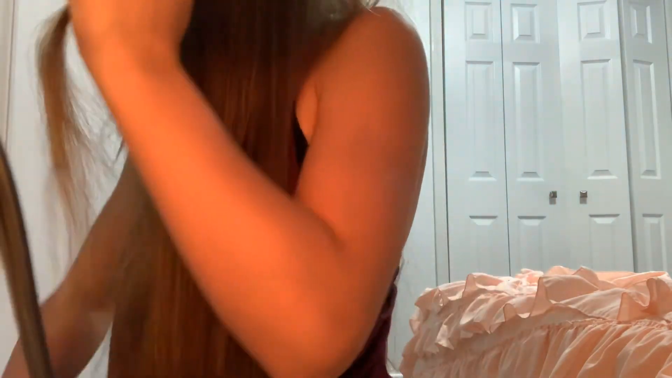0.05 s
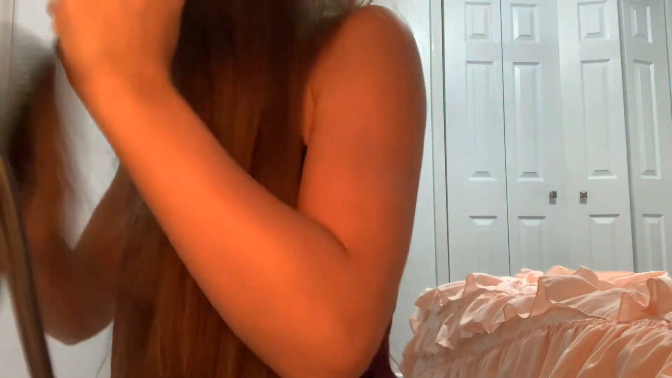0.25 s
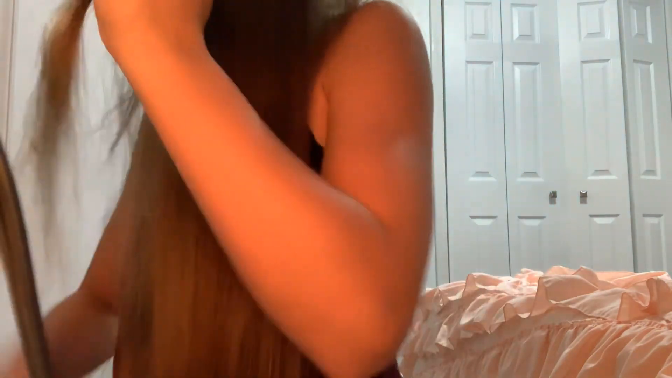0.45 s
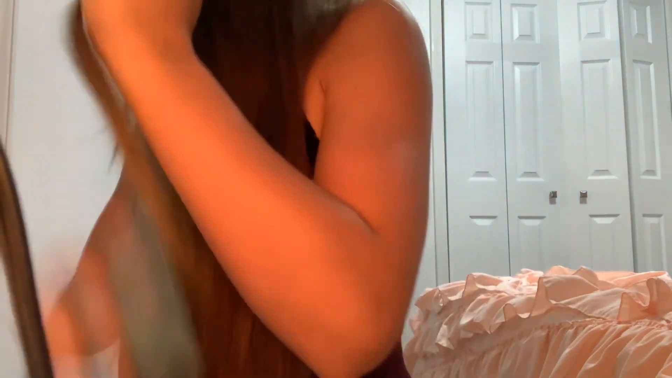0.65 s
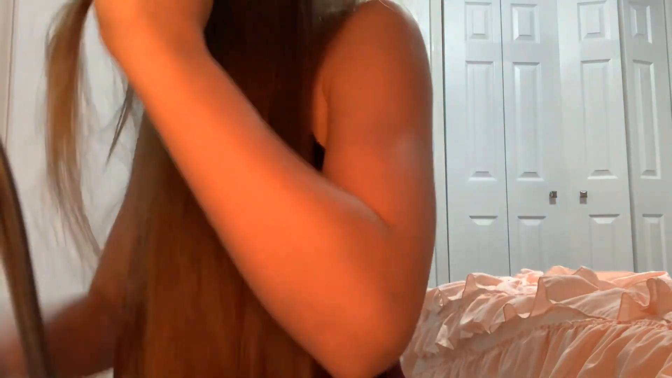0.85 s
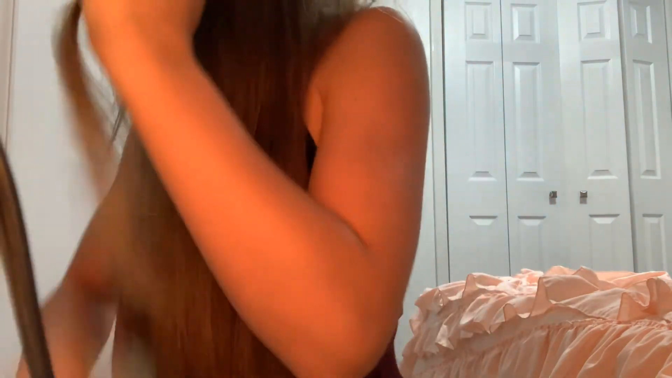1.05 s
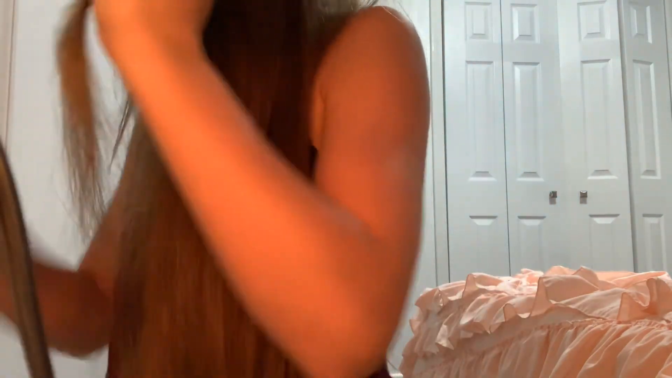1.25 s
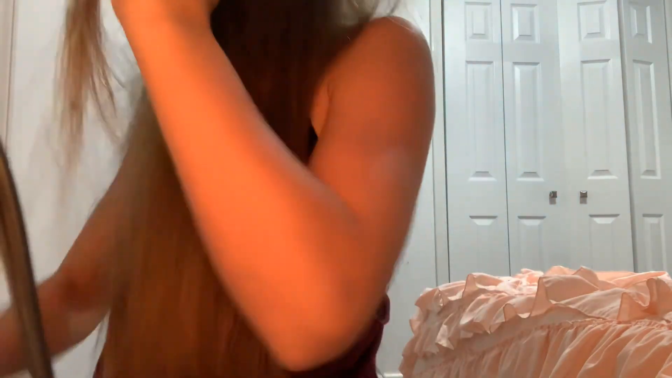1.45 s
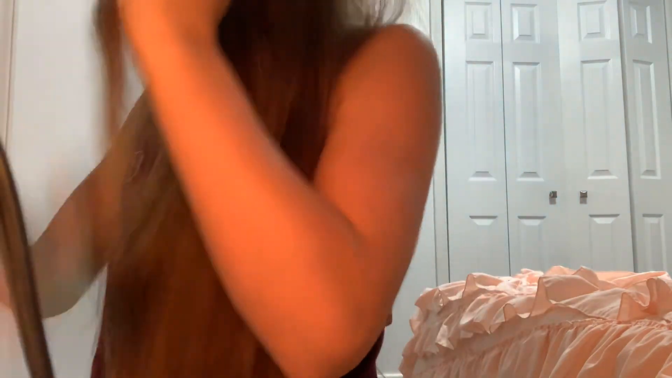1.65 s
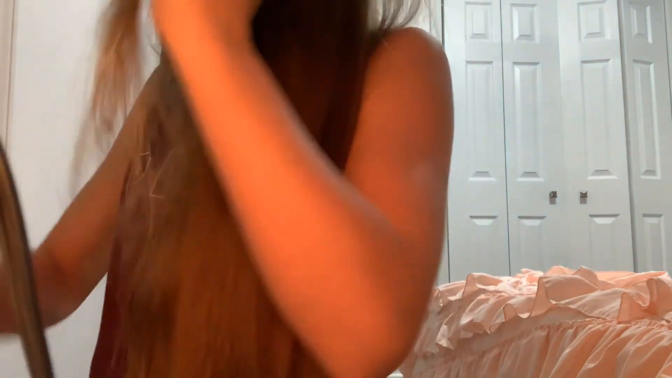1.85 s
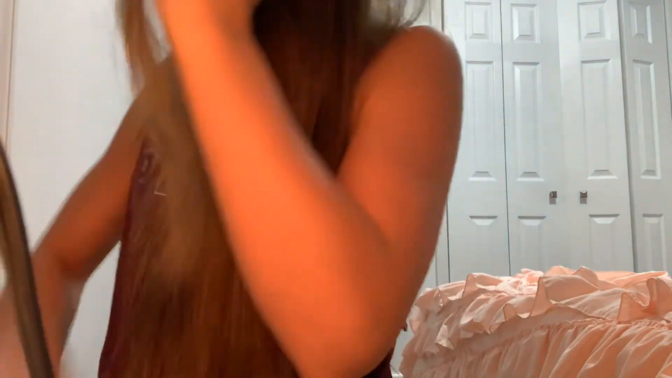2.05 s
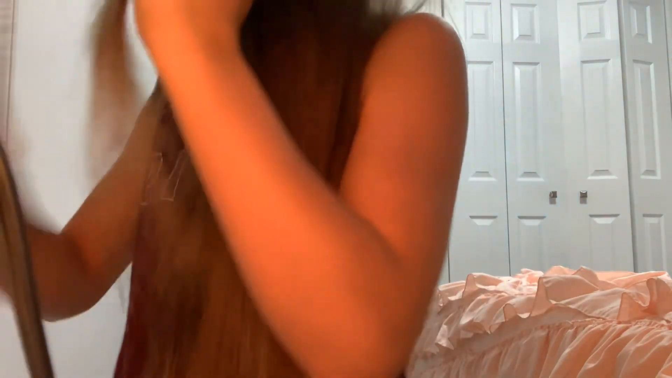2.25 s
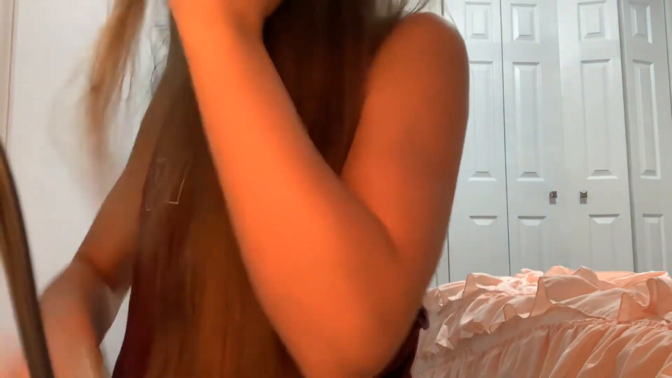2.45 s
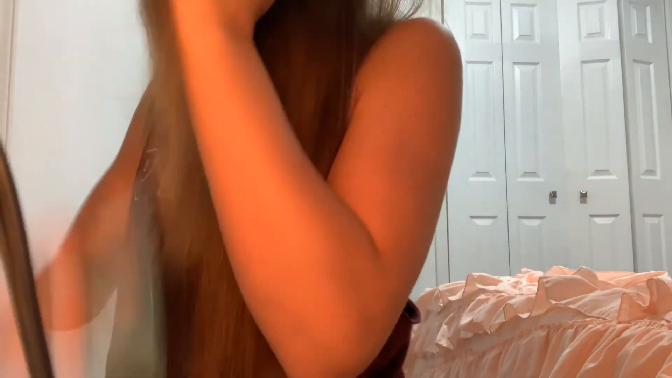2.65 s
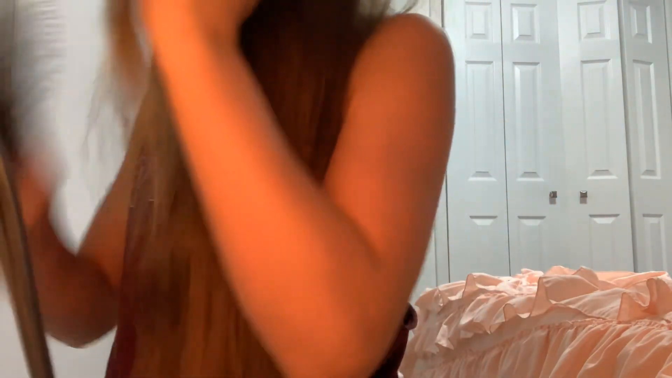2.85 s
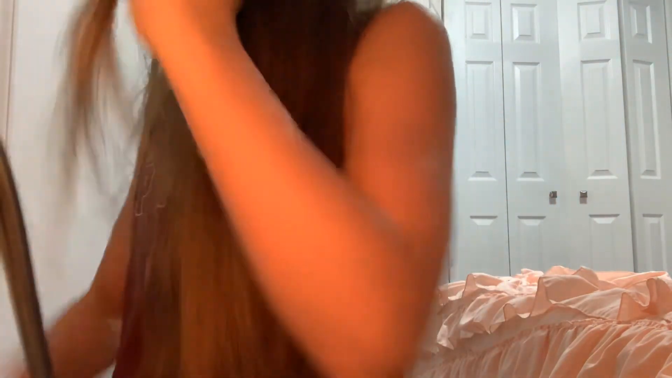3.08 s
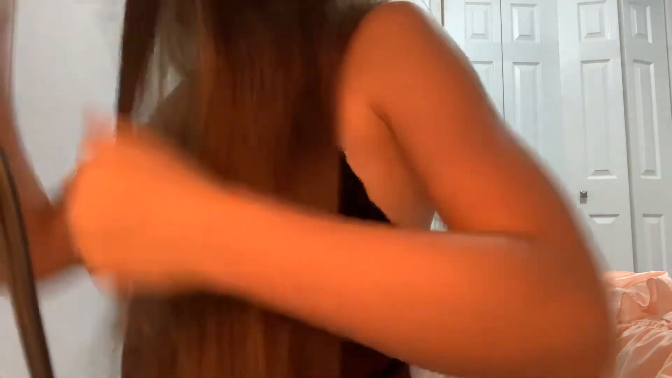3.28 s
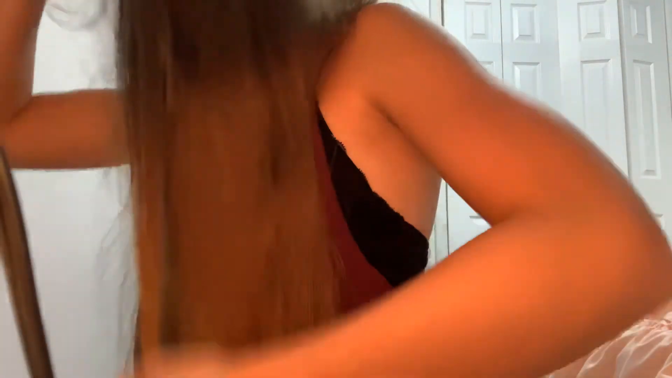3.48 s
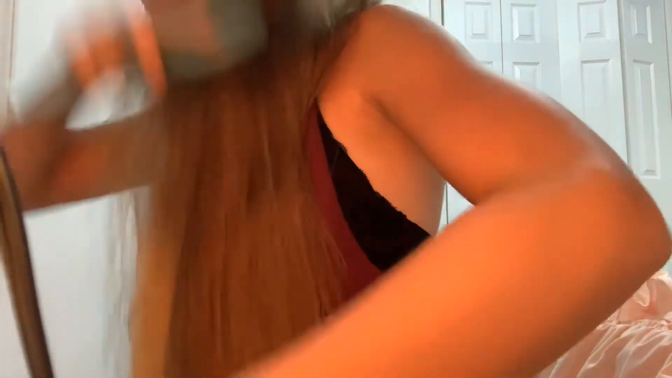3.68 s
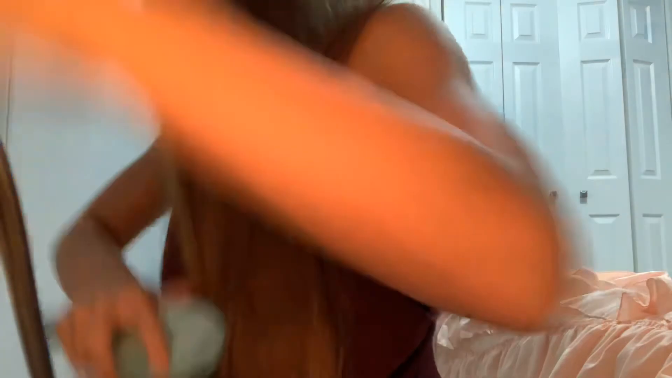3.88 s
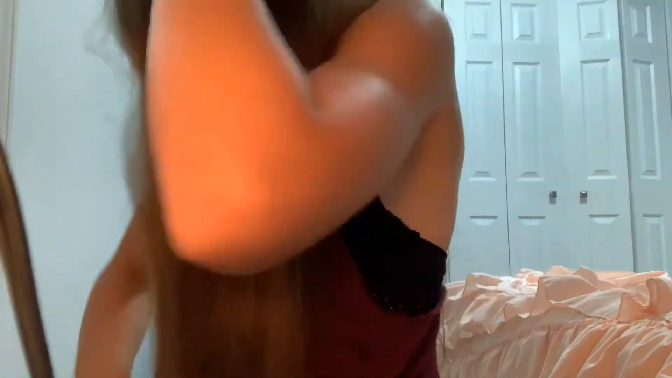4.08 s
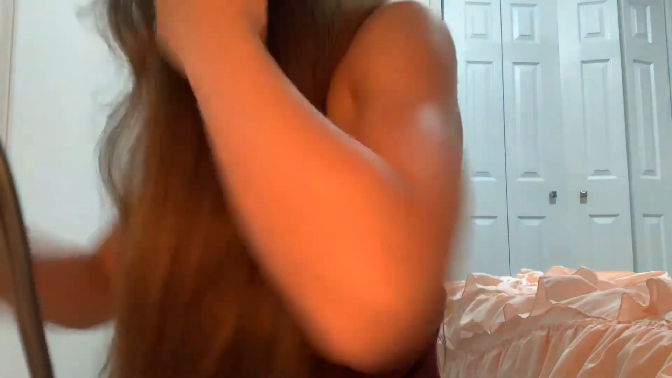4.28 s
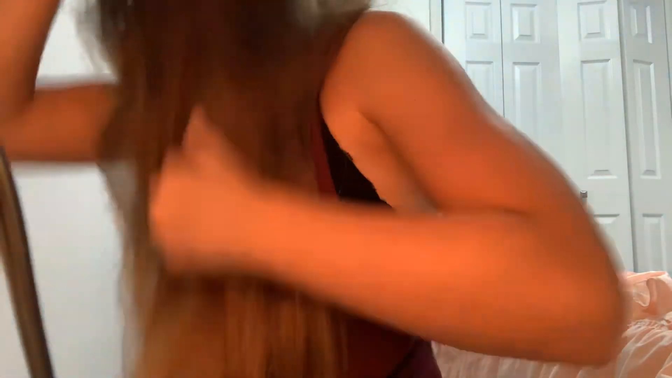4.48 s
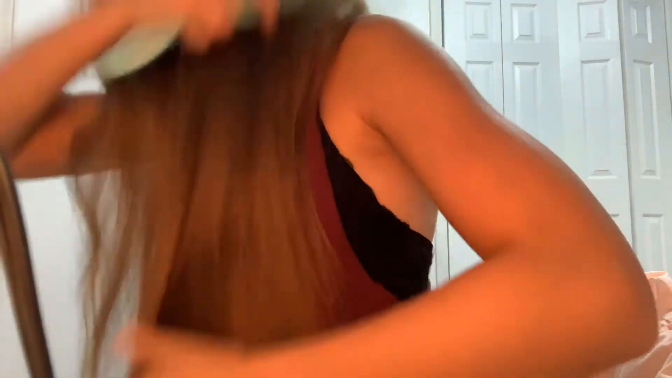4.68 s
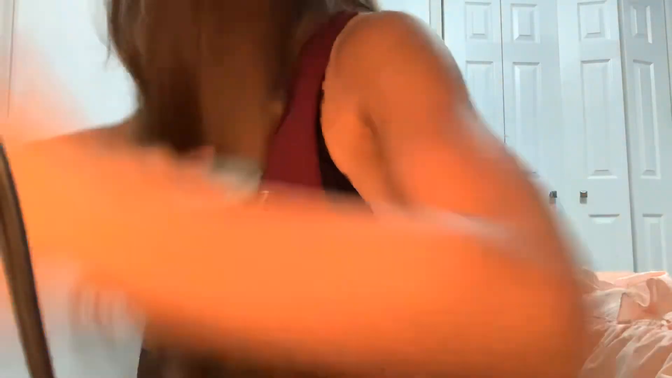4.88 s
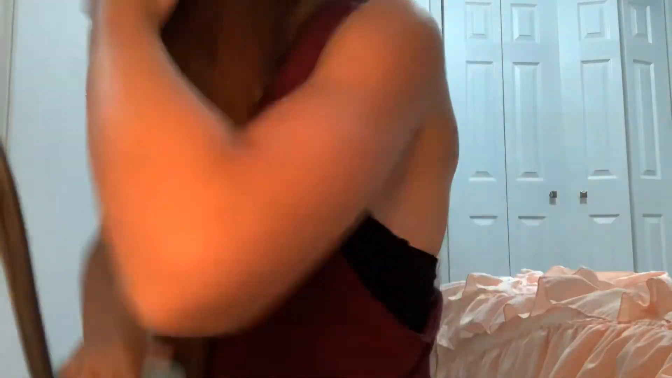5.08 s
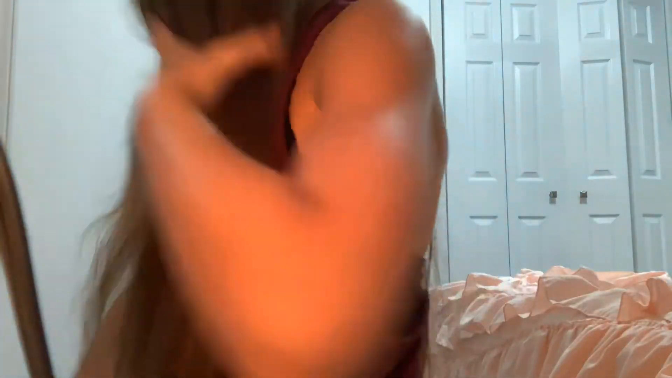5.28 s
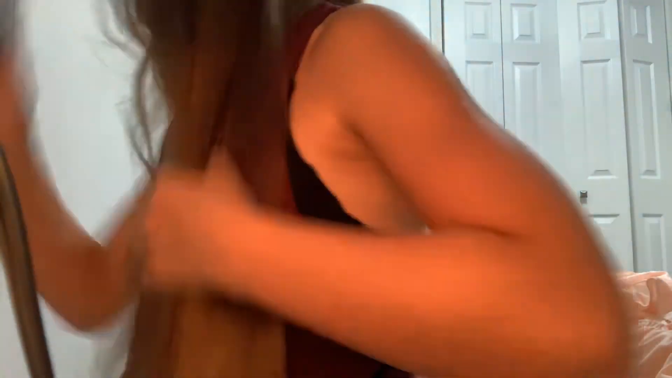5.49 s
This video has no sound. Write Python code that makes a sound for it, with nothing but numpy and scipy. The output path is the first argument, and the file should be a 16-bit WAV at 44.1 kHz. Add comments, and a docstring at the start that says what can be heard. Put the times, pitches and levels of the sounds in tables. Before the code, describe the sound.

A hairbrush snaps through knotted long hair in separate hollow crackling tugs, then makes two longer hissing, snagging strokes in a quiet bedroom.

```python
"""A cushion hairbrush works through long knotted hair close to a small microphone in a quiet bedroom.
Short tugs tear through the ends: bristles flick free in a crackle of impulses, and the pad thuds back
as a set of struck resonances. Two long strokes follow, filtered streams of tiny flicks that hiss at the
top and snag lower down, with short rubs around them. The room adds a decaying diffuse tail,
and filtered noise below it all makes soft moving air and a low ventilation hum."""
import sys
import numpy as np
from scipy import signal
from scipy.fft import rfft, irfft, next_fast_len
from scipy.io import wavfile
from scipy.ndimage import uniform_filter1d

SR = 44100
rng = np.random.default_rng(int(sys.argv[2]) if len(sys.argv) > 2 else 0)


def log_audio(samples):
    """Write samples as a 16-bit WAV file to the path given in sys.argv[1]."""
    # one column per channel
    frames = np.atleast_2d(samples).T
    # limit to full scale, then quantise
    limited = np.clip(frames, -1, 1)
    pcm = np.round(limited * 32767).astype(np.int16)
    wavfile.write(sys.argv[1], SR, pcm)


N = 243843
T = np.arange(N) / SR

# Short tugs, each tearing out of a knot in two steps; levels and spread are those of the second step:
# (start_s, spread_s, crackle_db, scrape_db, thud_db, pitch_hz, thud_lag_s, first_step_lead_s,
#  first_step_pitch_hz)
TUGS = [(.304, 0.0032, -40, -43.5, -33.5, 648, .0023, .003, 843),
        (.636, .0042, -42, -42.5, -34.5, 593, 0.00086, 0.0072, 800),
        (.739, 0.00099, -59, -48.5, -49, 990, .004, 0.00078, 810),
        (1.01, 0.004, -38.5, -41.5, -32, 910, 0.00047, .002, 548),
        (1.334, 0.0023, -48.5, -49.5, -35, 687, 0.00052, 0.0024, 647),
        (1.649, 0.0021, -50, -57, -40, 729, 0.00017, 0.0011, 865),
        (1.9998, 0.0027, -48, -55.5, -39, 797, 0.00025, 0.0048, 970),
        (2.3483, 0.0026, -37.5, -39, -28, 1158, 0.00149, 0.0017, 556),
        (2.640, 0.0024, -43, -43.5, -32.5, 766, 0.0012, .0065, 517),
        (2.940, 0.00271, -34.5, -55, -29, 714, 0.0045, .004, 736)]
# Small tangles that the brush jerks through during a stroke: (start_s, spread_s, thud_db, pitch_hz)
TANGLES = [(3.543, 0.0018, -53, 1060), (3.588, .007, -49, 1010), (3.617, .007, -49.5, 964),
           (3.803, .007, -44.5, 880), (3.877, 0.0014, -39, 870), (3.899, 0.0029, -39.5, 864),
           (3.959, 0.0057, -42, 960), (4.062, 0.0029, -44.5, 596), (4.088, 0.00714, -37, 597),
           (4.541, 0.0026, -54.5, 870), (4.68, 0.0061, -47.5, 905), (4.871, 0.0094, -40, 730),
           (4.95, 0.0043, -45.5, 680), (5.172, .008, -46.5, 790), (5.207, .006, -46, 690)]
FIRST_STEP_DB, FIRST_SPREAD = -5.5, 0.66  # the first step is weaker and shorter than the second
FIRST_TOP_DB, SECOND_TOP_DB = 8.5, -5.5  # treble of the crackle in each step
TANGLE_CRACKLE_DB, TANGLE_SCRAPE_DB = -20.5, -9  # relative to the thud
TANGLE_LAG_S, TANGLE_TOP_DB = 0.00045, -6


def knots():
    """Stick-slip release: a knot gives way in two quick steps, a tangle in a single softer, duller snap."""
    steps = []
    for start_s, spread, *levels_db, hz, lag, lead, first_hz in TUGS:
        first_db = np.add(levels_db, FIRST_STEP_DB)
        steps.append((start_s - lead, FIRST_SPREAD * spread, *first_db, first_hz, lag, FIRST_TOP_DB))
        steps.append((start_s, spread, *levels_db, hz, lag, SECOND_TOP_DB))
    for start_s, spread, thud_db, hz in TANGLES:
        levels_db = (thud_db + TANGLE_CRACKLE_DB, thud_db + TANGLE_SCRAPE_DB, thud_db)
        steps.append((start_s, spread, *levels_db, hz, TANGLE_LAG_S, TANGLE_TOP_DB))
    out = np.zeros(N)
    for start_s, *knot in steps:
        sound = snap(*knot)
        first = int(start_s * SR) - len(sound) // 2
        out[first:first + len(sound)] += sound
    return out


# Spectrum of the bristle ticks: (frequency_hz, level_db)
CRACKLE_SPECTRUM = [(200, -20), (1000, 19), (1300, -23), (1700, -10), (2300, 12.5), (2900, -3.5),
                    (3450, -2.5), (4300, 4), (5000, 4.5), (7600, 8), (9500, -2.5), (12500, 4.5),
                    (15500, 1.5)]
# Narrow resonances that colour the crackle, as from the microphone or a near reflection:
# (frequency_hz, width_hz, level_db over the plain crackle)
CRACKLE_RESONANCES = [(2890, 94, 9), (6040, 51, -2), (6720, 110, -3), (13000, 140, -4), (14700, 91, 11),
                      (14700, 130, -12)]
# Spectrum of hair scraping on bristles, in the snaps and the strokes: (frequency_hz, level_db)
SCRAPE_SPECTRUM = [(200, 3), (500, 8), (1250, -2.5), (1500, 4.5), (1750, 5), (2150, 7), (2500, 9.5),
                   (2800, 0.5), (3100, 1.5), (3500, -5), (6000, -5.5), (7900, -12), (9000, -34),
                   (16000, -39)]
# Radiation of the thud from the brush: (frequency_hz, level_db)
RADIATION_SPECTRUM = [(200, 2.5), (300, -1.5), (410, -19.5), (520, 0.5), (1200, -3.5), (1500, -10.5)]


def snap(spread, crackle_db, scrape_db, thud_db, hz, lag, top_db,
         spring_width_hz=130, spring_db=-5, rattle_db=-2, size=4096):
    """Release of elastic energy: bristles tick free in a rush, and the bent pad springs back just after."""
    t = (np.arange(size) - size // 2) / SR
    # the bristles go almost together, so the burst has steep edges
    rush = np.exp(-np.abs(t / (2.65 * spread)) ** 3)

    ticks = flicks(rate=5500, scatter_db=10.5, size=size) * rush
    crackle = colour(colour(ticks, CRACKLE_SPECTRUM), [(7000, 0), (11000, top_db)])
    crackle = crackle + sum(undb(db) * ring(crackle, f, width) for f, width, db in CRACKLE_RESONANCES)

    scrape = colour(flicks(rate=4400, scatter_db=0.5, size=size) * rush, SCRAPE_SPECTRUM)

    kicks = flicks(rate=3000, scatter_db=2.0, size=size) * bell(t, lag, spread)
    rattle = pad(kicks, hz, reach_octaves=1.1)
    # the release itself is one push, which swells and dies within a few cycles
    push = signal.unit_impulse(size, np.searchsorted(t, lag - spread / 2))
    spring = ring(ring(push, hz, spring_width_hz), hz, spring_width_hz)
    thud = colour(undb(rattle_db) * unit(rattle) + undb(spring_db) * unit(spring), RADIATION_SPECTRUM)

    mix = undb(crackle_db) * unit(crackle) + undb(scrape_db) * unit(scrape) + undb(thud_db) * unit(thud)
    # levels are those of the energy gathered into a hundredth of a second
    return np.sqrt(SR / 100 / size) * mix


# Modes of the brush pad and back: (frequency_hz, width_hz, level_db before weighting by the focus)
PAD_MODES = [(565, 200, 5.5), (685, 105, 1.5), (824, 111, 4), (975, 51, 3), (1139, 34, 7), (1426, 99, -6)]


def pad(x, focus_hz, reach_octaves, low_hz=440, high_hz=1400):
    """Modal resonance: modes near the focus ring most; the body is too small for bass, too soft for treble."""
    body = 0
    for hz, width, db in PAD_MODES:
        distance = np.log2(hz / focus_hz) / reach_octaves
        body = body + undb(db) * ring(x, hz, width) / (1 + distance ** 2)
    band = signal.butter(2, [low_hz, high_hz], "band", fs=SR, output="sos")
    return signal.sosfilt(band, body)


# Spectrum of strands sliding past bristles: (frequency_hz, level_db)
HISS_SPECTRUM = [(200, -5.5), (700, 9), (1700, -2), (2600, 3), (3400, 1), (4400, 2.5), (6200, 3.5),
                 (7900, 3.5), (8600, -7), (10000, -16), (12500, -5), (14800, -10)]
# Spectrum of the top hiss: (frequency_hz, level_db)
SHEEN_SPECTRUM = [(4000, -32), (7500, 6.5), (9000, 8.5), (11000, 5.5), (13000, -12), (14800, 7),
                  (16000, 14)]


def brushing(hiss_db=1, drag_db=-1, scrape_db=1, sheen_db=3.0, catch_db=2):
    """Sliding friction: strands hiss past the bristles, which flick back, scraping and ringing the pad."""
    slide, drag, scrape, sheen, pad_hz = gestures()
    catch = undb(catch_db * walk(rate=180))  # tangles hold and let go unevenly
    strands = flicks(rate=24000, scatter_db=5.5)
    tips = flicks(rate=22000, scatter_db=5)
    bristles = flicks(rate=2600, scatter_db=7.5) * catch
    tangles = flicks(rate=2600, scatter_db=7.5) * catch
    return (undb(hiss_db) * slide * unit(colour(strands, HISS_SPECTRUM))
            + undb(sheen_db) * sheen * unit(colour(tips, SHEEN_SPECTRUM))
            + undb(scrape_db) * scrape * unit(colour(tangles, SCRAPE_SPECTRUM))
            + undb(drag_db) * drag * unit(pad(bristles, pad_hz, reach_octaves=0.3)))


# All levels in these three tables are before the mix gains of brushing().
# Speed of the brush down each long stroke, as the level of its hiss: one list a stroke of (time_s, level_db)
SPEED_CURVES = [
    [(3.47, -72.5), (3.53, -79), (3.564, -68.5), (3.68, -56.5), (3.856, -61.5), (3.88, -54), (3.922, -62),
     (4.056, -65), (4.09, -83), (4.108, -69)],
    [(4.52, -75), (4.526, -68.5), (4.562, -78.5), (4.71, -54), (4.748, -60), (4.878, -52), (4.892, -58),
     (5.114, -69), (5.186, -67.5), (5.215, -90)],
]
# Drag of the hair on the bristles, as the level of the pad: one list a stroke of (time_s, level_db)
DRAG_CURVES = [
    [(3.47, -61), (3.622, -52.5), (3.65, -60), (3.868, -50.5), (3.9, -39.5), (3.926, -50.5), (4.108, -45.5)],
    [(4.52, -56.5), (4.544, -51), (4.554, -54.5), (4.852, -46), (4.862, -44), (5.064, -59), (5.215, -44)],
]
# Short rubs of brush and hand on the hair: (centre_s, spread_s, hiss_db, pad_db, scrape_db)
SHORT_RUBS = [(.005, 0.014, -63, -54.5, -61), (.067, 0.01, -72.5, -60.5, -75),
              (.272, 0.0042, -62.5, -49, -62), (0.286, 0.0036, -56, -42, -49),
              (0.712, 0.0019, -75, -44, -60), (.724, 0.0038, -70, -49, -57),
              (0.749, 0.0051, -65, -44, -58.5), (1.115, 0.027, -89, -80, -72),
              (1.676, 0.017, -81, -76, -67), (2.096, 0.032, -98, -57.5, -72),
              (2.391, 0.031, -70, -55.5, -67.5), (3.2, 0.0078, -67, -67.5, -82),
              (3.24, 0.031, -76, -77, -78.5), (5.505, 0.014, -79, -74, -80)]
ENTER_S, LEAVE_S = 0.014, 0.021  # the bristles sink into the hair, and slip off its ends
PAD_TOP_HZ, PAD_ENDS_HZ, PAD_RUB_HZ = 917, 820, 856  # the pad rings lower as hair gathers in it
SCRAPE_TOP_DB, SCRAPE_ENDS_DB = -6.5, -3  # relative to the mean of hiss and pad; the ends are more tangled
SHEEN_TOP_DB, SHEEN_ENDS_DB = 4.5, -1  # smooth hair near the scalp has more top hiss than the ends
# top hiss grows faster than hiss, and equals it at this level before the two settings above
SHEEN_EVEN_DB, SHEEN_POWER = -48.5, 1.61


def gestures():
    """Friction control: speed and drag set the gains of hiss, pad, scrape and top hiss, and pad pitch falls."""
    gains = np.zeros((3, N))  # hiss, pad, scrape
    gloss_db = np.zeros(N)
    pad_hz = np.full(N, float(PAD_RUB_HZ))
    for speed, drag in zip(SPEED_CURVES, DRAG_CURVES):
        start, end = speed[0][0], speed[-1][0]
        contact = np.interp(T, [start - ENTER_S, start, end, end + LEAVE_S], [0, 1, 1, 0])

        def down(top, ends):
            """Linear interpolation from the scalp to the ends."""
            return np.interp(T, [start, end], [top, ends])

        hiss_db = np.interp(T, *np.transpose(speed))
        pad_db = np.interp(T, *np.transpose(drag))
        # scraping takes both speed and drag
        scrape_db = (hiss_db + pad_db) / 2 + down(SCRAPE_TOP_DB, SCRAPE_ENDS_DB)
        gains += contact * undb([hiss_db, pad_db, scrape_db])
        gloss_db += contact * down(SHEEN_TOP_DB, SHEEN_ENDS_DB)
        pad_hz = np.where(contact > 0, down(PAD_TOP_HZ, PAD_ENDS_HZ), pad_hz)
    for centre_s, spread, *levels_db in SHORT_RUBS:
        gains += undb(levels_db)[:, None] * bell(T, centre_s, spread)
    sheen = undb(SHEEN_EVEN_DB + gloss_db) * (gains[0] / undb(SHEEN_EVEN_DB)) ** SHEEN_POWER
    return (*gains, sheen, pad_hz)


def flicks(rate, scatter_db, size=N):
    """Random impulse train: single bristles let go at random moments, some much harder than others."""
    happens = rng.random(size) < rate / SR  # rate is the mean number a second
    sign = np.sign(rng.random(size) - .5)
    strength = np.clip(rng.standard_normal(size), -2, 2)
    return happens * sign * undb(scatter_db * strength)


def walk(rate):
    """Slow random modulation: levels held 1 / rate s and smoothed, scaled to rms 1."""
    hold = int(SR / rate)
    steps = np.repeat(rng.standard_normal(N // hold + 1), hold)
    return unit(uniform_filter1d(steps, hold)[:N])


# Bedroom reverberation, the time to decay by 60 dB: (frequency_hz, t60_s)
DECAY_TIMES = [(300, 0.25), (900, 0.26), (2500, 0.23), (7000, 0.18), (15000, 0.12)]
# Spectrum that colours the tail: (frequency_hz, level_db)
TAIL_SPECTRUM = [(300, 3.5), (680, -3.5), (1100, -5.5), (2400, 0), (5000, -1.5), (15000, 0.5)]


def room(x, wet_db=-13, first_s=0.0058, size=22050):
    """Diffuse reverberation: walls and doors return a short tail whose highest treble dies first."""
    t = np.arange(size) / SR
    hz = np.fft.rfftfreq(size, 1 / SR)
    noise = rfft(rng.standard_normal(size))
    centres = [f for f, t60 in DECAY_TIMES]
    tail = 0
    # overlapping bands, each with its own exponential decay
    for (f, t60), pick in zip(DECAY_TIMES, np.eye(len(centres))):
        weight = read(list(zip(centres, pick)), hz)
        tail = tail + irfft(noise * weight, size) * np.exp(-np.log(1000) * t / t60)
    onset = np.clip(t / first_s - 1, 0, 1)  # silent until first_s, full at twice that
    tail = colour(tail * onset, TAIL_SPECTRUM)
    return x + undb(wet_db) * signal.fftconvolve(x, unit(tail) / np.sqrt(size))[:N]


# Spectrum of the moving air: (frequency_hz, level_db)
AIR_SPECTRUM = [(25, -15.5), (42, -13.5), (60, 14), (100, 10.5), (150, -0.5), (220, 7.5), (310, -3),
                (600, -3.5), (1050, -7), (1350, -21.5), (2600, -24.5), (4000, -27), (13500, -36),
                (15500, -44)]
# Ventilation hum: (pitch_hz, half_width_hz of each of two resonators in series, level_db)
HUM_TONES = [(58.7, 4, -68.5), (73.4, 3.6, -70.5), (87, 13, -79), (128.2, 3.6, -69), (189.1, 7.7, -64)]


def ventilation(air_db=-61.5):
    """Filtered noise: soft broadband air, and narrow resonances of noise as a few wavering hum tones."""
    out = undb(air_db) * unit(colour(rng.standard_normal(N), AIR_SPECTRUM))
    for hz, half_width, db in HUM_TONES:
        tone = ring(ring(rng.standard_normal(N), hz, 2 * half_width), hz, 2 * half_width)
        out = out + undb(db) * unit(tone)
    return out


def undb(db):
    """Logarithmic level: decibels to amplitude gain."""
    return 10 ** (np.asarray(db) / 20)


def unit(x):
    """Root-mean-square normalisation to 1."""
    return x / np.sqrt(np.mean(x ** 2))


def bell(t, centre, spread):
    """Gaussian envelope: a smooth swell whose power has the given spread in time."""
    return np.exp(-((t - centre) / (2 * spread)) ** 2)


def ring(x, hz, width_hz):
    """Second-order resonance, gain 1 at its centre."""
    return signal.lfilter(*signal.iirpeak(hz, hz / width_hz, fs=SR), x)


def read(points, hz):
    """Linear interpolation of (frequency_hz, value) points on a log-frequency axis."""
    f, value = np.transpose(points)
    return np.interp(np.log(hz + 1), np.log(f), value)


def colour(x, points):
    """Minimum-phase filter: a causal response with the given spectrum, built from its cepstrum."""
    size = next_fast_len(len(x) + 4096, real=True) // 2 * 2
    gain = undb(read(points, np.fft.rfftfreq(size, 1 / SR)))
    cepstrum = irfft(np.log(gain))
    # folding the cepstrum onto positive time makes the filter causal
    cepstrum[1:size // 2] *= 2
    cepstrum[size // 2 + 1:] = 0
    return irfft(rfft(x, size) * np.exp(rfft(cepstrum)))[:len(x)]


def scene():
    """Superposition: brush and hair excite the bedroom, and the ventilation is added."""
    brush = knots() + brushing()
    return (room(brush) + ventilation())[None]


def record(dry, low_hz=32, top_hz=15900):
    """Band limiting: the small microphone drops the deepest bass, and the recorder cuts the top."""
    high_pass = signal.butter(2, low_hz, "high", fs=SR, output="sos")
    low_pass = signal.ellip(10, .2, 70, top_hz, fs=SR, output="sos")
    return signal.sosfilt(low_pass, signal.sosfilt(high_pass, dry))


dry = scene()
out = record(dry)
log_audio(out)
```